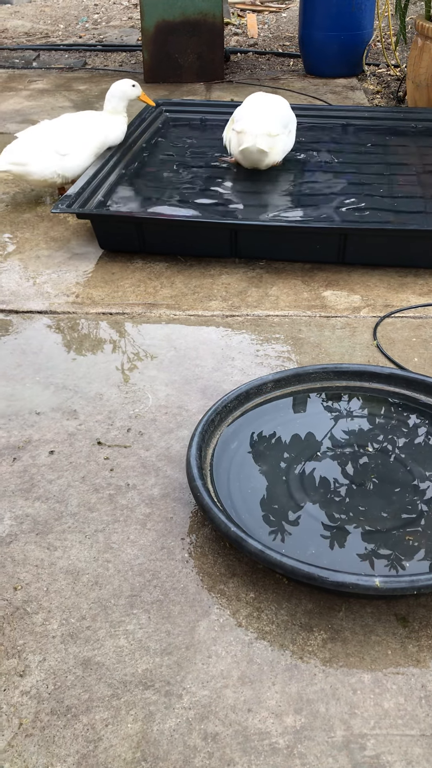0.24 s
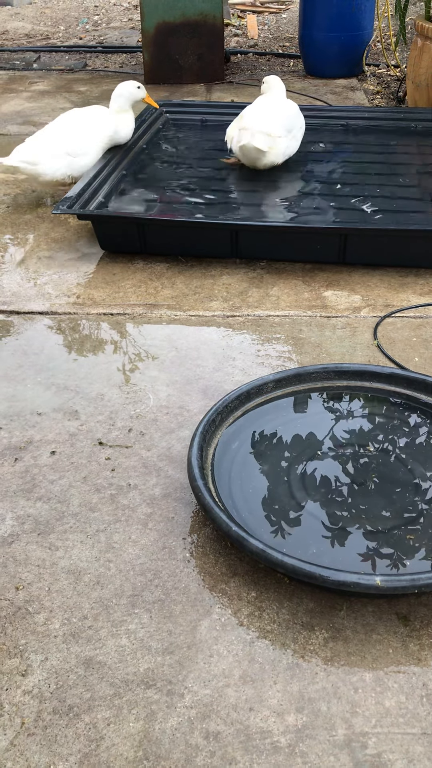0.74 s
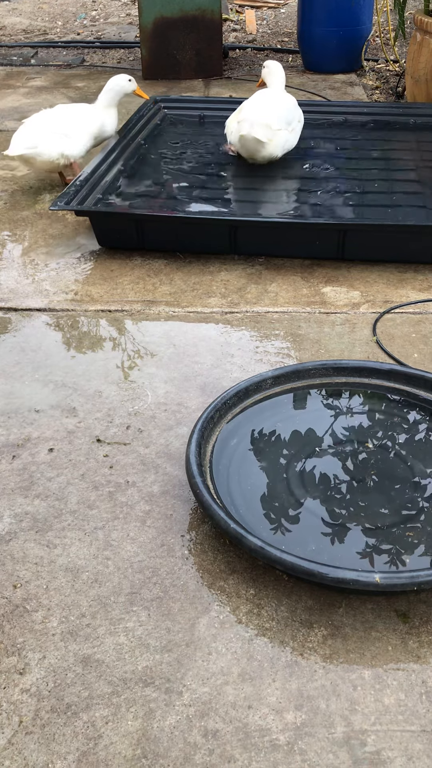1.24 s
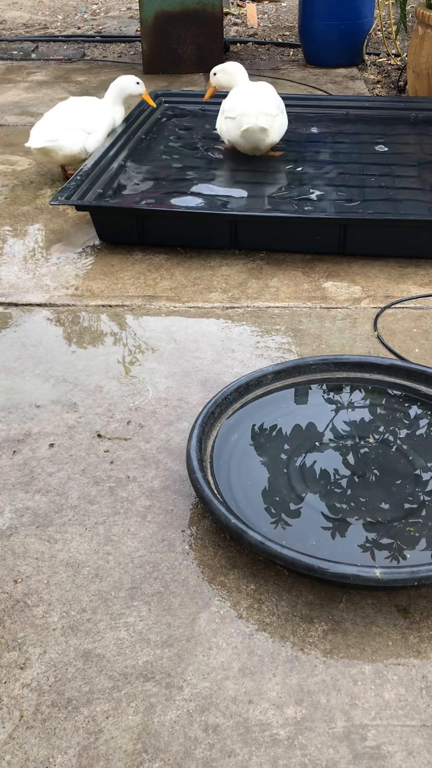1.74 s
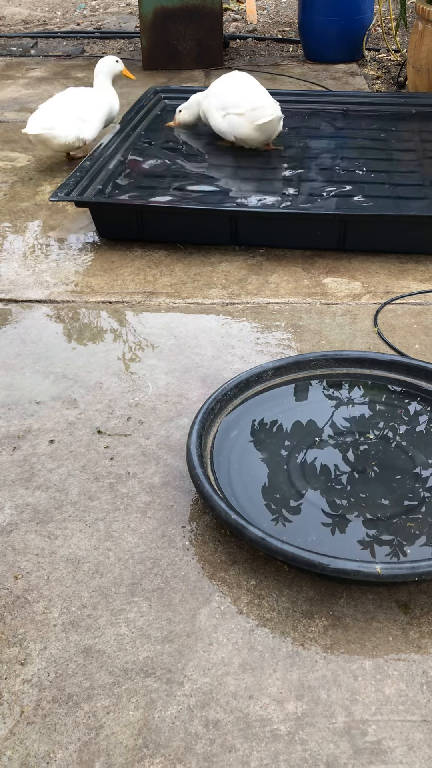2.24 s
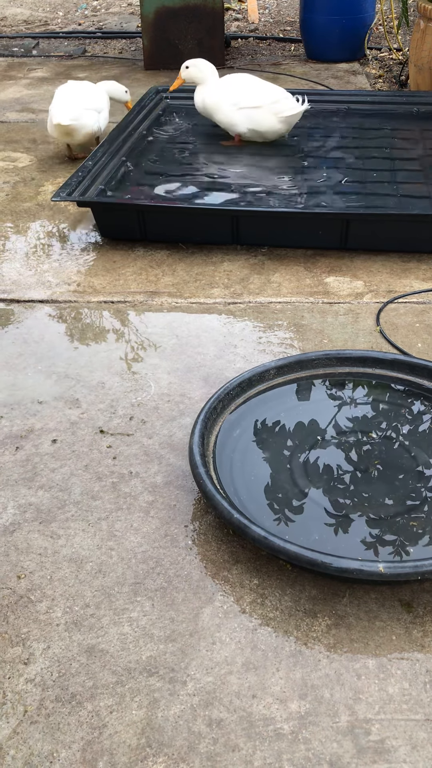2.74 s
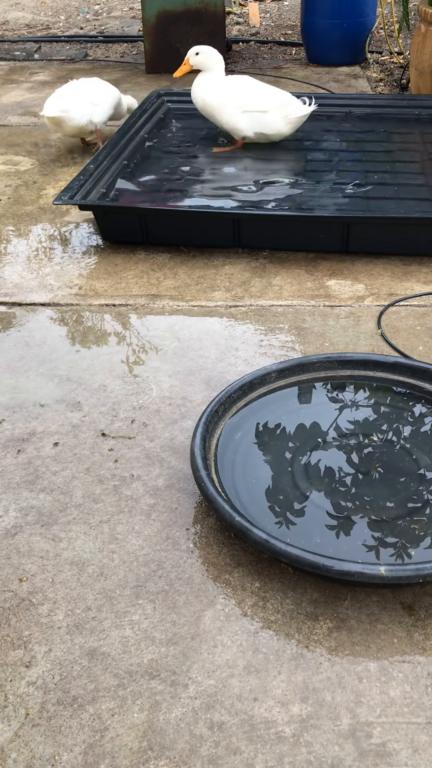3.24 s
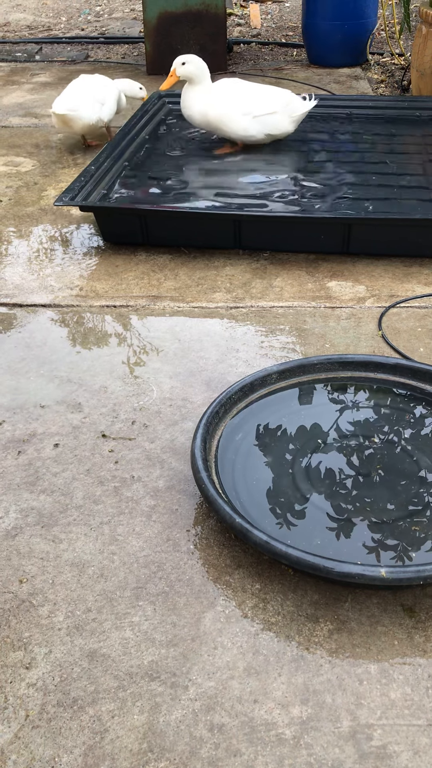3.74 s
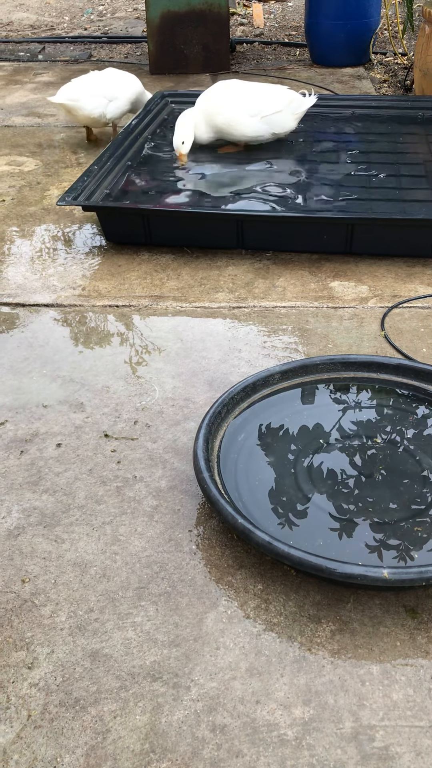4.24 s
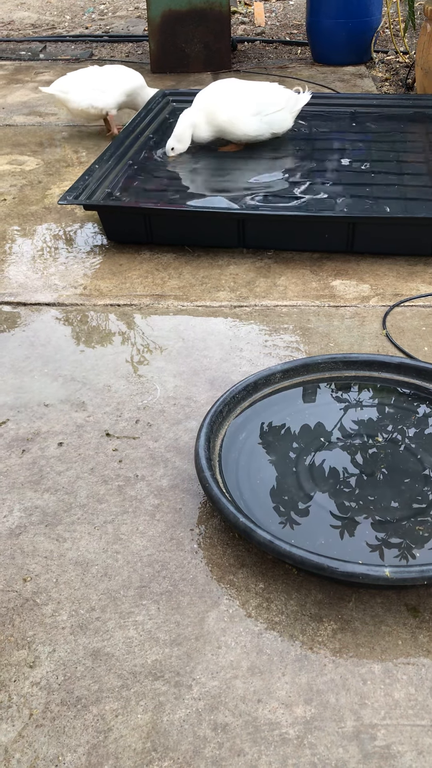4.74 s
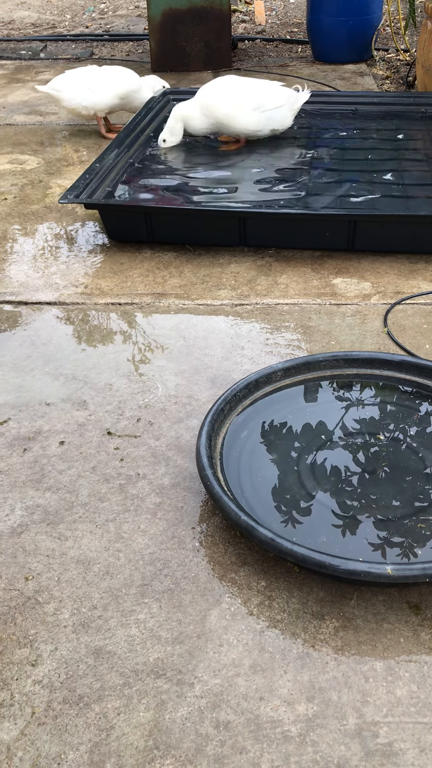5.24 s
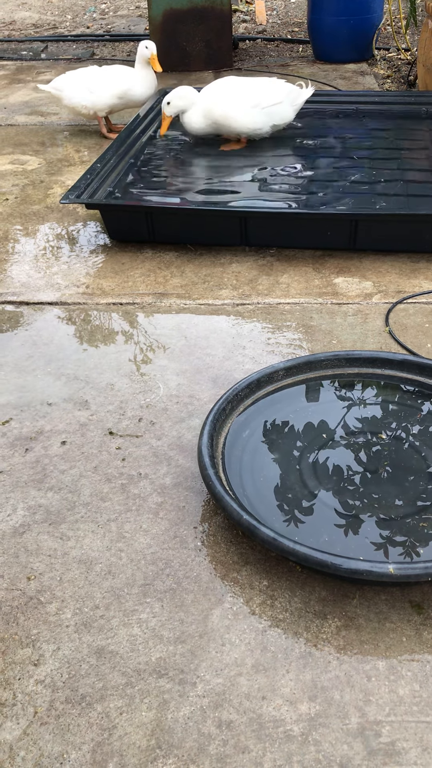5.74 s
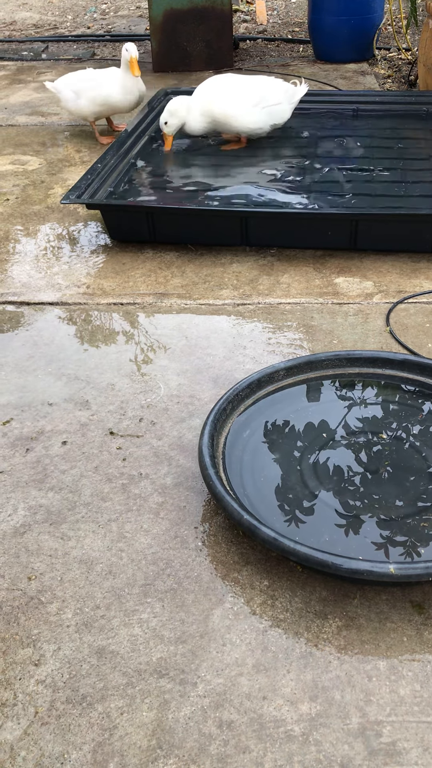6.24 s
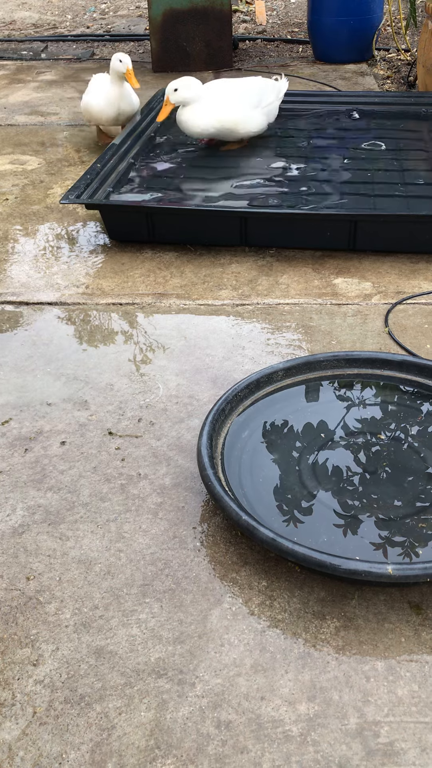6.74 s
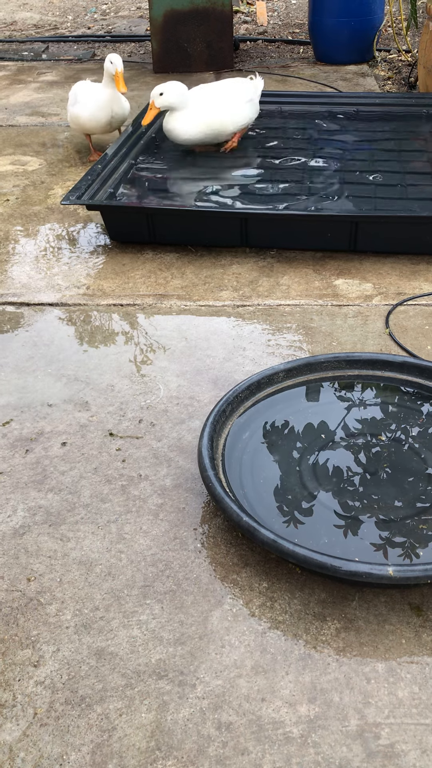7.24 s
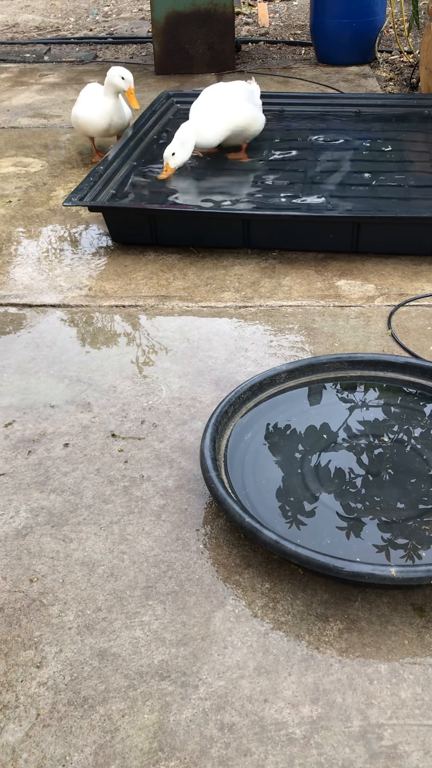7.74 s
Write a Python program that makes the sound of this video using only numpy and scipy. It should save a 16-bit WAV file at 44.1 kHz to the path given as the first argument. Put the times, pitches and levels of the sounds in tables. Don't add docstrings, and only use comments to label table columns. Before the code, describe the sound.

Ducks dabble in a shallow plastic tray, clicking bills and dripping water, then break into raspy clucks and a splash over a low hum.

```python
import sys
import numpy as np
from scipy import signal
from scipy.io import wavfile
from scipy.ndimage import uniform_filter1d

SR = 44100
rng = np.random.default_rng(int(sys.argv[2]) if len(sys.argv) > 2 else 0)


def to_linear_factor(level_db):
    exponent = np.asarray(level_db, float) / 20
    return 10 ** exponent


def unload_audio(sound):
    columns = np.transpose(np.atleast_2d(sound))
    steps = np.round(np.clip(columns, -1, 1) * 32767)
    wavfile.write(sys.argv[1], SR, steps.astype(np.int16))


N = 353232
TIME = np.arange(N) / SR
BILL_TICK_HZ = 5740

# time in seconds, pump level in dB, town rumble in dB.
LOAD_AND_TRAFFIC = [(0.0, -56, -45), (0.87, -48.5, -48.5), (1.76, -53, -48), (2.47, -49, -41),
                    (6.16, -52, -41.5), (8.01, -73, -49)]


def unit(x):
    return x / np.sqrt(np.mean(x ** 2))


def ring(x, hz, width):
    return signal.lfilter(*signal.iirpeak(hz, hz / width, fs=SR), x)


def add(out, s, sound):
    i = int(s * SR)
    out[i:i + len(sound)] += sound[:N - i]


def walk(rate):
    hold = int(SR / rate)
    steps = np.repeat(rng.standard_normal(N // hold + 1), hold)
    return 1.401 * uniform_filter1d(uniform_filter1d(steps, hold), hold)[:N]


def echo(x, t60, gap_s, dull_hz):
    t = np.arange(int(.6 * SR)) / SR
    tail = rng.standard_normal(len(t)) * 1000 ** (-t / t60) * (t > gap_s)
    tail = signal.lfilter(*signal.butter(1, dull_hz, fs=SR), tail)
    return signal.fftconvolve(x, tail / np.sqrt(np.sum(tail ** 2)))[:N]


def grain(hz, t60, glide):
    t = np.arange(int(t60 * SR) + 8) / SR
    return np.sin(2 * np.pi * hz * t * (1 + glide * t / t60)) * 1000 ** (-t / t60)


def bubbles(count, low_hz, span, cycles, uneven, glide):
    out = np.zeros(N)
    for when, pitch, size in rng.random((count, 3)):
        hz = low_hz * span ** pitch
        add(out, when * N / SR, grain(hz, cycles / hz, glide) * (1.06 - size) ** -uneven)
    return unit(out)


def click(db, hz, low_db):
    t = np.arange(int(.06 * SR)) / SR
    tail = 0.1 * np.minimum(t / 0.0033, 1) * 1000 ** (-t / 0.09)
    crack = rng.standard_normal(len(t)) * (1000 ** (-t / 0.005) + tail) * np.minimum(t / 0.00064, 1)
    tick = 0.8 * ring(crack, hz, 0.23 * hz)
    sparkle = 0.22 * ring(crack, 15500, 6200)
    clack = 3.37 * to_linear_factor(low_db) * ring(crack, 3300, 2060)
    return to_linear_factor(db) * (tick + sparkle + clack)


def syrinx(length, hz, peak, spread, jitter, scatter_db):
    chance = rng.standard_normal((16, 2))
    starts = np.cumsum((1 + jitter * chance[:, 0]) / hz)
    starts = starts - starts[0]
    keep = starts < length
    swell = np.exp(-((starts[keep] / length - peak) / spread) ** 2)
    swell[-1] *= to_linear_factor(-8.5)
    return starts[keep], swell * to_linear_factor(scatter_db * chance[keep, 1])


def puff(snap, breath, push_s, top_hz):
    air = np.zeros(2200)
    hiss = np.hanning(int(push_s * SR))
    air[:len(hiss)] = breath * hiss * rng.standard_normal(len(hiss))
    air[0] += snap
    return signal.sosfilt(signal.butter(6, top_hz, fs=SR, output="sos"), air)


def tract(x, modes, scale):
    out = 0
    for k, (hz, width, db) in enumerate(modes):
        out = out + (-1) ** k * to_linear_factor(db) / np.sqrt(width) * ring(x, hz * scale, width)
    return out


def call(db, length, parts):
    throat, rest = np.zeros((2, int((length + .06) * SR)))
    for at, throat_puff, rest_puff in parts:
        add(throat, at, throat_puff)
        add(rest, at, rest_puff)
    both = throat + rest
    nose = 0.13 * ring(both, 820, 50)
    return (both - nose) * to_linear_factor(db - 0.5) / np.std(throat[:int(length * SR)])


def slide(x):
    slide_s = 0.01215
    speed = 1 + .08 * np.clip(2 * TIME[:len(x)] / slide_s - 1, -1, 1)
    return np.interp(np.cumsum(speed), np.arange(len(x)), x)


def pump():
    # multiple of the turning rate, level in dB, share of the load swing.
    orders = [(2, -51.5, 0.14), (3, -55, 1.16), (4, -70.5, 1.03), (6, -76, 0.53)]
    s, load_db, _ = np.transpose(LOAD_AND_TRAFFIC)
    load = np.interp(TIME, s, load_db - np.mean(load_db))
    pump_hz = 46.34
    turn = 2 * np.pi * np.cumsum(pump_hz * (1 + 0.00279 * walk(1.52))) / SR
    out = np.zeros(N)
    for k, db, share in orders:
        out += to_linear_factor(db + 1.5 * walk(2) + share * load) * np.sqrt(2) * np.sin(k * turn + k)
    return out


def town():
    # frequency in Hz, density in dB per Hz.
    rumble = [(25, -25), (70, 5), (123, 2), (153, -13.5), (190, -16), (326, -21.5), (489, -29.5)]
    # frequency in Hz, density in dB per Hz.
    hiss = [(695, -22.5), (936, -23.5), (1940, -38.5), (6380, -42.5), (9000, -44.5), (10600, -54),
            (12900, -41.5), (16000, -46)]
    s, _, rumble_db = np.transpose(LOAD_AND_TRAFFIC)
    traffic = np.interp(TIME, s, rumble_db - np.mean(rumble_db))
    colour_hz, colour_db = np.transpose(rumble + hiss)
    out = np.zeros(N)
    for hz in 30 * 2 ** np.arange(0, 9.1, 1 / 3):
        band = unit(ring(ring(rng.standard_normal(N), hz, hz / 3.37), hz, hz / 2.8))
        bass_share = np.clip(1.3 - hz / 500, 0, 1)
        swell = traffic * bass_share + 1.3 * walk(7.9)
        density_db = np.interp(np.log(hz), np.log(colour_hz), colour_db)
        out += band * to_linear_factor(density_db + 10 * np.log10(hz) + swell)
    return unit(out) * to_linear_factor(-46)


def surface_fizz():
    # time in seconds, level in dB.
    stirring = [(0.0, -71.5), (0.38, -82), (0.71, -65), (1.05, -76.5), (2.32, -73), (2.45, -71),
                (2.99, -76.5), (3.59, -67), (3.92, -79.5), (5.26, -71), (6.24, -79.5), (8.01, -63.5)]
    fizz = bubbles(count=3000, low_hz=2600, span=5.8, cycles=5, uneven=.36, glide=.06)
    return fizz * to_linear_factor(np.interp(TIME, *np.transpose(stirring)) - 1.7)


def ringing_drops():
    # start in seconds, peak in dB, bubble pitch in Hz.
    drops = [(0.1034, -45, 2870), (0.914, -53.5, 3740), (0.9684, -63, 3020), (1.1527, -54.5, 4170),
             (1.3443, -53, 2230), (1.421, -52.5, 4240), (2.0896, -54, 3039), (2.2957, -57, 2740),
             (2.336, -47.5, 2670), (2.3444, -51, 4730), (2.3805, -50.5, 3300), (2.4, -51, 2810),
             (2.4333, -49, 4300), (2.445, -54, 3090), (2.5671, -58, 2760), (2.7663, -40.5, 2300),
             (3.3064, -43.5, 3680), (3.4498, -55.5, 2460), (3.714, -55, 3833), (4.801, -57, 2160),
             (4.9132, -57, 2100), (5.4191, -58, 2702), (6.041, -51.5, 2620), (6.2886, -52, 2280),
             (6.5206, -52, 2866), (6.917, -42, 3480), (7.289, -41, 4447), (7.49, -43, 4564),
             (7.9158, -51, 1950)]
    out = np.zeros(N)
    for s, db, hz in drops:
        add(out, s, to_linear_factor(db - 16) * grain(1.37 * hz, 9 / hz, glide=0))
        add(out, s, to_linear_factor(db) * grain(hz, 82 / hz, glide=0.055))
    return out


def bill_clicks():
    # time in seconds, tick peak in dB, clack over tick in dB.
    snaps = [(0.105, -43.5, -4), (0.4364, -38, -9), (1.2375, -47, 5.5), (1.26, -40, -6), (1.5574, -50.5, 7),
             (1.771, -52, 4), (1.867, -39.5, -3), (1.9637, -43, -2.5), (2.09, -49, -5), (2.188, -42.5, -6),
             (2.3356, -38, -8), (2.4862, -41, -12), (2.7668, -43, 6), (2.826, -53.5, 8.5), (3.009, -44, -9),
             (3.8345, -52, 11.5), (4.6646, -38, -14), (4.938, -41, -1), (5.142, -51, 7), (5.447, -49, 7),
             (5.5508, -31, -22), (5.9401, -48, 10.5), (5.9703, -42, 2), (6.2883, -54, 7),
             (6.9043, -29.5, -10.5), (6.9455, -42, 10.5), (7.198, -44.5, 4), (7.2942, -24, -9),
             (7.4897, -43, 8), (7.9266, -41, 3)]
    out = np.zeros(N)
    for s, db, low_db in snaps:
        add(out, s - .0004, click(db, BILL_TICK_HZ, low_db))
    return out


def gurgle():
    # crest time in seconds, crest level in dB, rise in seconds, fall in seconds.
    waves = [
        (.736, -66.5, 0.33, 0.52),
        (2.55, -64.5, 1.6, 0.24),
        (4.426, -68.5, 0.092, 0.47),
        (4.938, -67, 0.092, 0.48),
        (6.86, -59, 0.085, 0.4),
        (7.585, -45.5, 0.093, 0.079),
    ]
    range_db = 19.5
    slosh = np.zeros(N)
    for s, db, rise, fall in waves:
        away = np.maximum((s - TIME) / rise, (TIME - s) / fall)
        slosh += to_linear_factor(db - range_db * away ** 2)
    deep = bubbles(count=900, low_hz=193.6, span=5.13, cycles=23.3, uneven=0.17, glide=0.1)
    patter = bubbles(count=1300, low_hz=800, span=6.5, cycles=22, uneven=.42, glide=.12)
    return (to_linear_factor(1.5) * deep + to_linear_factor(-8) * patter) * uniform_filter1d(slosh, size=900)


def gulps():
    # start in seconds, peak in dB, pitch in Hz.
    big_bubbles = [(0.454, -51, 850), (0.879, -51.5, 530), (0.959, -44.5, 746), (1.059, -55, 780),
                   (1.234, -52, 1124), (1.356, -42.5, 960), (1.45, -44.5, 1126), (2, -44, 1434),
                   (2.098, -62, 770), (2.191, -46, 1186), (2.229, -52.5, 817), (2.539, -49, 686),
                   (3.36, -44.5, 1336), (3.833, -51, 836), (5.069, -53, 618.7), (5.142, -48, 548),
                   (6.081, -50, 1304), (6.79, -48, 574.6), (6.815, -62, 1400)]
    out = np.zeros(N)
    for s, db, hz in big_bubbles:
        t60 = min(0.11 * (800 / hz) ** 2, .15)
        gulp = grain(hz, t60, glide=0.126)
        swell = np.minimum(TIME[:len(gulp)] / (0.04 * t60), 1)
        add(out, s, to_linear_factor(db - 0.5) * gulp * swell)
    return out


def rasping_duck():
    # start in seconds, length in seconds, level in dB, mouth scale, brightness in dB.
    rasps = [(0.466, 0.046, -58, 0.89, -10), (0.567, 0.074, -62.5, 0.74, -15),
             (0.749, 0.063, -57.5, 0.94, 0), (1.251, 0.044, -59, 0.93, -1.5),
             (1.507, 0.065, -56, 0.89, -0.5), (1.863, 0.079, -48, 0.9, -10.5),
             (3.835, 0.06, -55.5, 0.92, 3.5), (5.555, 0.044, -49, 0.96, -11),
             (5.944, 0.05, -45.5, 0.96, -5), (6.291, 0.053, -46, 1.02, -6.5),
             (6.417, 0.0613, -52, 0.93, -8.5), (6.573, 0.072, -48, 1.02, 1.5),
             (6.904, 0.09, -51.5, 0.75, 3.5), (7.152, 0.074, -45, 0.92, 4.5),
             (7.497, 0.069, -43.5, 1.13, -8), (7.639, 0.068, -51.5, 0.88, -4)]
    # frequency in Hz, width in Hz, level in dB.
    throat_modes = [(1280, 90, -1), (1620, 90, 0), (630, 100, -12)]
    # frequency in Hz, width in Hz, level in dB.
    bill_modes = [(2100, 140, -7), (2600, 120, -10.5), (4500, 5200, -5)]
    out = np.zeros(N)
    for s, length, db, mouth, bright_db in rasps:
        parts = []
        hz = 62.02 + 1.1 * s
        for at, size in zip(*syrinx(length, hz, .5, .6, jitter=.03, scatter_db=1.5)):
            air = puff(snap=.28, breath=.25, push_s=.016, top_hz=4200)
            opening = np.sin(np.pi * at / length)
            shape = mouth * (0.923 + 0.13 * opening)
            throat = ring(tract(air, throat_modes, shape), 1370, 4700)
            size /= np.std(throat)
            bill = ring(tract(air, bill_modes, shape), 2100, 7600)
            bill *= (0.87 + opening) * to_linear_factor(bright_db)
            parts.append((at, size * slide(throat), size * slide(bill)))
        add(out, s, call(db, length, parts))
    return out


def gliding_bubbles():
    # start in seconds, length in seconds, peak in dB, first pitch in Hz, last pitch in Hz.
    glides = [(0.714, .045, -56, 600, 900), (0.916, .03, -66.5, 3350, 3260), (0.87, .03, -59, 560, 710),
              (0.53, 0.018, -60, 1300, 1400), (0.88, 0.035, -75, 3050, 2880), (1.065, .05, -59, 900, 617),
              (1.344, 0.011, -55, 1590, 2420), (2.095, 0.036, -56, 640, 820), (1.6, .025, -56, 1400, 1000),
              (2.6, 0.026, -55, 850, 800), (2.355, .02, -57, 760, 700), (4.45, .025, -67, 2720, 2400),
              (4.54, 0.022, -54, 536, 648), (4.713, 0.019, -65, 2320, 3370),
              (5.068, 0.015, -65, 2100, 1600), (5.745, 0.023, -52, 1020, 960),
              (6.51, 0.038, -60, 2700, 2850), (6.808, 0.039, -54, 899, 1750), (6.7, .03, -43, 690.7, 530),
              (7.917, .016, -54, 1930, 2600)]
    out = np.zeros(N)
    for s, length, db, from_hz, to_hz in glides:
        t = np.arange(int(length * SR)) / SR
        turn = 2 * np.pi * t * (from_hz + (to_hz - from_hz) * t / length / 2)
        add(out, s, to_linear_factor(db) * np.sin(np.pi * (t / length) ** 0.74) * np.sin(turn))
    return out


def bursting_drops():
    # time in seconds, peak in dB, ring in Hz.
    bursts = [(0.5412, -35.5, 11300), (1.421, -34.5, 6400), (1.4926, -20.5, 6400), (1.9997, -15.5, 6140),
              (2.292, -36, 6400), (2.309, -35, 9050), (2.36, -38, 5670), (2.3725, -30.5, 7060),
              (2.5446, -46, 10900), (2.6165, -44, 14100), (2.64, -41, 11600), (2.6698, -43, 5720),
              (3.267, -42, 11400), (3.306, -30, 7400), (3.3555, -32, 6600), (3.4264, -26.5, 7700),
              (3.716, -20.5, 7300), (4.2318, -43.5, 13900), (4.32, -30.5, 6260), (4.445, -33.5, 14000),
              (5.783, -32, 12700), (5.9817, -22.5, 6800), (6.6782, -40, 12600), (6.791, -35, 5670),
              (7.2288, -36.5, 9905), (7.525, -22, 8300), (7.5636, -15.5, 4970), (7.583, -23, 13500),
              (7.658, -29, 8885), (7.8673, -33, 6320)]
    out = np.zeros(N)
    for s, db, hz in bursts:
        low_db = -25.5 - 29 * np.log2(hz / BILL_TICK_HZ)
        add(out, s - .0004, click(db, hz, low_db))
    return out


def sparrow_voice(voice, db, hoarse):
    at, hz, shape_db = np.transpose(voice)
    t = np.arange(at[0], at[-1], 1 / SR)
    warble = unit(uniform_filter1d(rng.standard_normal(8820), size=70))[:len(t)]
    pitch = uniform_filter1d(np.interp(t, at, hz), size=500) * (1 + hoarse * warble)
    fade = np.minimum(1, np.minimum(t - at[0], at[-1] - t) / 0.0016)
    level = to_linear_factor(db + np.interp(t, at, shape_db))
    return level * fade * np.sin(2 * np.pi * np.cumsum(pitch) / SR)


def sparrows():
    # seconds after the start, pitch in Hz, level in dB. The second falling chirp is
    falling = [
        [(0, 5370, -3), (.015, 5330, 6.5), (.035, 4750, 5), (.06, 3780, -10)],
    ]
    first = [
        [(0, 3980, 20), (.02, 4620, 16.5), (.06, 4350, 1)],
        [(.015, 3473, 12.5), (.045, 3100, 22), (.09, 2520, -12)],
    ]
    second = [
        [(0, 4500, -12), (.02, 5400, -8.5), (.04, 5270, -16)],
        [(0, 3100, -7), (.026, 4204, 4), (.038, 4282, 4), (.06, 3241, 2), (.1, 2580, -24)],
    ]
    level = [
        [(0, 5030, -2), (.02, 4930, -5), (.05, 4750, 4)],
    ]
    second_falling = [
        [(0, 5150, -4), (.022, 5170, 7.5), (.036, 4600, 4), (.055, 3830, -6)],
    ]
    # start in seconds, level in dB.
    falling_at = [(0.605, -57), (1.648, -56.5)]
    first_at = [(1.538, -67), (3.455, -67), (5.291, -68), (7.64, -70)]
    second_at = [(1.688, -47.5), (3.585, -44.5), (5.437, -44), (7.774, -49)]
    level_at = [(2.712, -54)]
    second_falling_at = [(4.474, -55)]
    songs = [(falling, falling_at, .025), (first, first_at, .07), (second, second_at, .052),
             (level, level_at, .012), (second_falling, second_falling_at, .012)]
    out = np.zeros(N)
    for chirp, sung, hoarse in songs:
        for s, db in sung:
            for voice in chirp:
                add(out, s + voice[0][0], sparrow_voice(voice, db, hoarse))
    slap_s = .115
    out += to_linear_factor(-19.5) * np.roll(out, int(slap_s * SR)) * (TIME > slap_s)
    return to_linear_factor(-12) * out + 0.37 * echo(out, t60=.42, gap_s=0.0043, dull_hz=11000)


def clucking_duck():
    # start in seconds, length in seconds, pulse rate in Hz, level in dB, brightness in dB.
    clucks = [(0.702, 0.04, 99.7, -75, -13), (0.865, 0.011, 100, -70, 24), (2.594, 0.039, 102.4, -81, 7),
              (5.736, 0.037, 105.5, -63, -24), (5.983, 0.023, 101.5, -59, -16),
              (6.355, 0.034, 105.5, -45, -6), (6.473, 0.036, 111.1, -44.5, -9),
              (6.609, 0.041, 157.5, -36, -5), (6.79, 0.018, 100.6, -60, -5),
              (6.935, 0.055, 94.6, -48.5, -3), (7.0575, 0.023, 100.7, -40, -2.5),
              (7.303, 0.04, 105.6, -41.5, 2.5), (7.432, 0.05, 99.75, -38.5, 0.5),
              (7.5153, 0.046, 107, -40.5, 0), (7.67, 0.0407, 98.9, -36.5, -7),
              (7.743, 0.028, 140.5, -31.5, -10), (7.938, 0.057, 104.5, -36.5, -5)]
    swells = [(0.27, .6, 0.97), (0.22, 0.49, 0.99), (0.32, .6, 1.01), (0.5, 0.68, 1), (0.4, 0.71, 0.92),
              (0.63, 0.57, 0.9), (0.64, .65, 0.97), (0.47, 0.5, 0.94), (.3, 0.71, 1.04), (0.46, 0.46, 0.99),
              (0.39, 0.63, 1.012), (0.61, 1, 0.98), (0.31, 0.58, 0.989), (0.65, 0.66, 0.95),
              (.35, 0.41, 0.99), (0.76, 0.59, 1.04), (0.43, 2.24, 1.01)]
    # frequency in Hz, width in Hz, level in dB.
    chest_modes = [(205, 50, .5), (303, 70, -3.5), (400, 70, -12), (650, 80, 0)]
    # frequency in Hz, width in Hz, level in dB.
    throat_modes = [(660, 80, -14), (1250, 140, 0), (1660, 180, -5), (2080, 260, -9)]
    # frequency in Hz, width in Hz, level in dB.
    bill_modes = [(2600, 370, -2.5), (2880, 1070, 1), (3710, 1100, -2), (4730, 2700, -6)]
    out = np.zeros(N)
    for (s, length, hz, db, bright_db), (peak, spread, scale) in zip(clucks, swells):
        chest_db = -0.5 - 0.61 * (db + 45.5)
        shape = scale + .01 * rng.standard_normal()
        parts = []
        for at, size in zip(*syrinx(length, hz, peak, spread, jitter=.015, scatter_db=1.3)):
            air = size * puff(snap=1, breath=.06, push_s=.0075, top_hz=5100)
            throat = ring(tract(air, throat_modes, shape), 1180, 970)
            shut_db = -10.5 * (at == 0)
            bill = 0.93 * ring(tract(air, bill_modes, shape), 3700, 3300)
            bill *= size ** 0.39 * to_linear_factor(bright_db + shut_db)
            chest = to_linear_factor(chest_db) * tract(air, chest_modes, hz ** .5 / 10)
            parts.append((at, throat, bill + chest))
        add(out, s, call(db, length, parts))
    return out


def landing_droplets():
    # time in seconds, peak in dB, pitch in Hz.
    landings = [(0.7094, -52, 1750), (0.7544, -45, 1680), (0.8044, -50, 2170), (0.8674, -55, 1640),
                (1.2794, -54, 2090), (1.3818, -50, 5600), (1.3994, -57, 4430), (2.0667, -49, 3120),
                (2.0714, -49, 1560), (2.1094, -49, 1680), (2.1904, -42, 1510), (2.2608, -61, 1970),
                (2.2827, -49, 6420), (2.3164, -57, 2750), (2.3844, -48, 3280), (2.3914, -50, 3310),
                (2.4094, -52, 1870), (2.4234, -48, 4260), (2.4494, -53, 2870), (2.4738, -46, 5580),
                (2.4994, -43, 5490), (2.5744, -61, 1540), (2.6174, -47, 1500), (4.4494, -57, 2445),
                (4.6794, -59, 1800), (4.8194, -71.5, 1540), (4.9132, -52, 2100), (4.9227, -41.5, 3900),
                (4.9594, -53, 4480), (5.0674, -56, 1540), (5.1422, -39.5, 1680), (5.1544, -51, 1750),
                (6.2864, -44, 1720), (6.562, -54, 1680), (6.6594, -32, 1639), (6.9264, -39, 2280),
                (7.1354, -59, 1490), (7.7174, -40, 1640), (7.8924, -41, 3900)]
    out = np.zeros(N)
    for s, db, hz in landings:
        add(out, s, to_linear_factor(db) * grain(hz, 15 / hz, glide=.05))
    return out


def thrown_water():
    # start in seconds, length in seconds, level in dB, centre in Hz.
    sprays = [(0.761, 0.1, -67, 5970), (0.85, 0.04, -65.5, 8000), (1.232, 0.045, -67, 5990),
              (1.377, 0.037, -61.5, 4900), (1.484, 0.044, -71, 6880), (1.958, 0.034, -63, 7000),
              (2.07, 0.077, -64, 4530), (2.356, 0.066, -68, 6000), (2.415, 0.057, -63.5, 5400),
              (2.483, 0.042, -59.5, 5630), (2.606, 0.033, -68, 4000), (2.998, 0.043, -65, 7000),
              (4.663, 0.041, -62, 5100), (4.912, 0.076, -62.5, 4440), (5.138, 0.022, -56.5, 2270),
              (6.485, 0.11, -64.5, 7900), (6.842, 0.081, -67, 1505), (6.895, 0.066, -61, 7800),
              (7.193, 0.043, -56, 4540), (7.287, 0.025, -52.5, 7880), (7.563, 0.049, -56, 8000)]
    out = np.zeros(N)
    for s, length, db, hz in sprays:
        ticks = to_linear_factor(np.repeat(np.clip(5 * rng.standard_normal(500), -15, 9), 14))
        drops = unit(ring(ticks * rng.standard_normal(7000), hz, 0.49 * hz))
        cloud = np.hanning(int(min(length, .11) * 1.28 * SR))
        add(out, s - 0.28 * length, to_linear_factor(db) * cloud * drops[:len(cloud)])
    return out


def tray_thumps():
    # time in seconds, peak in dB, boom in Hz, knock in dB.
    blows = [
        (1.504, -54.5, 266, 4),
        (1.877, -49, 278, -7.5),
        (2.08, -46.5, 202, -20),
        (2.358, -42.5, 254, -26),
        (2.595, -43, 323, -8.5),
        (4.357, -49.5, 317, -36),
        (4.432, -43, 260, -26),
        (4.933, -40.5, 228, -32),
        (5.154, -37.5, 278, -44),
    ]
    out = np.zeros(N)
    t = np.arange(int(.06 * SR)) / SR
    for s, db, hz, knock_db in blows:
        blow = rng.standard_normal(len(t)) * np.minimum(t / 0.00097, 1) * 1000 ** (-t / 0.21)
        boom = ring(ring(blow, hz, 104), hz, 290)
        knock = 1.01 * to_linear_factor(knock_db) * ring(blow, 570, 440)
        add(out, s, to_linear_factor(db) / np.max(abs(boom)) * (boom + knock))
    return out


def scene():
    ducks = rasping_duck() + clucking_duck()
    water = surface_fizz() + gurgle() + gulps() + gliding_bubbles() + thrown_water()
    drops = ringing_drops() + bursting_drops() + landing_droplets()
    near = ducks + water + drops + bill_clicks() + tray_thumps()
    yard = to_linear_factor(-14.5) * echo(near, t60=0.2, gap_s=0.00583, dull_hz=2640)
    return (near + yard + sparrows() + pump() + town())[None]


def band_limit(x):
    return signal.sosfilt(signal.butter(12, 16490, fs=SR, output="sos"), x)


def record(dry):
    top = signal.ellip(6, .5, 26, 15750, fs=SR, output="sos")
    return band_limit(signal.sosfilt(top, dry))


dry = scene()
out = record(dry)
unload_audio(out)
```